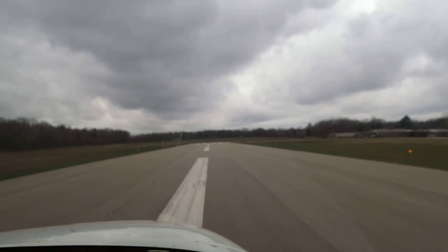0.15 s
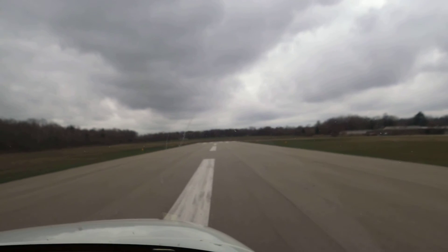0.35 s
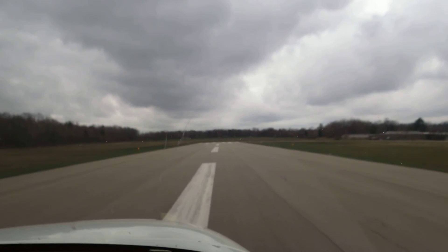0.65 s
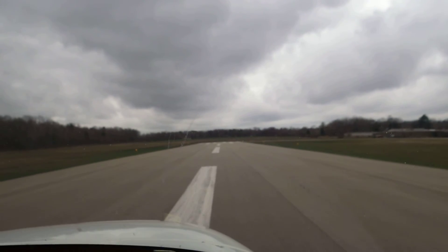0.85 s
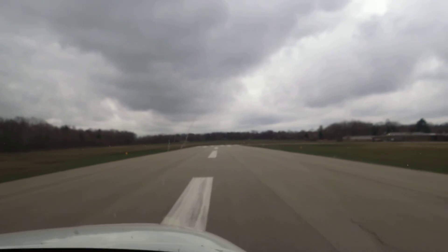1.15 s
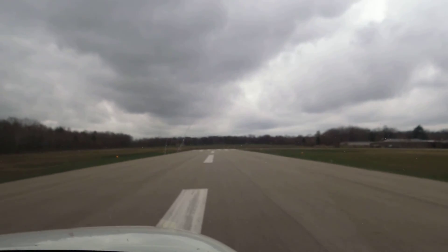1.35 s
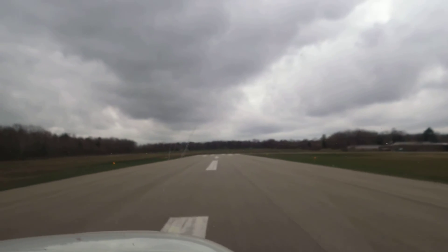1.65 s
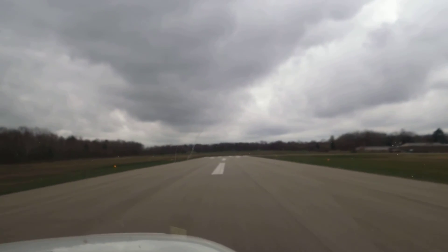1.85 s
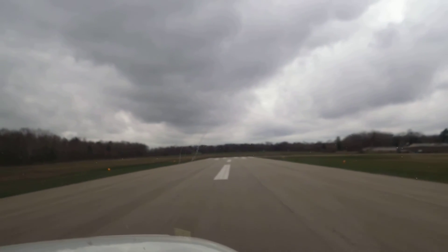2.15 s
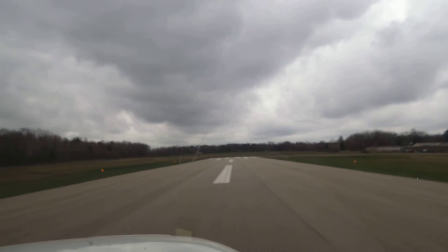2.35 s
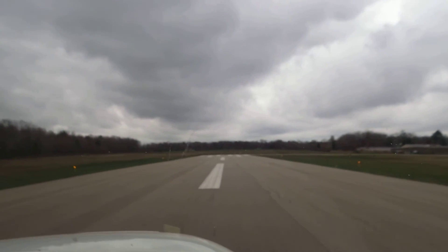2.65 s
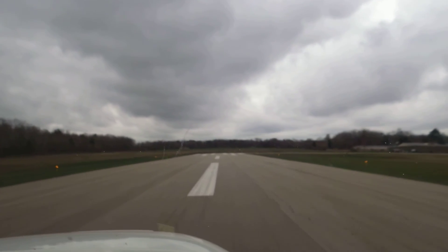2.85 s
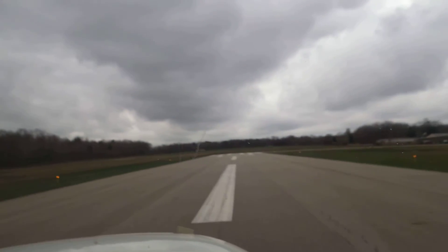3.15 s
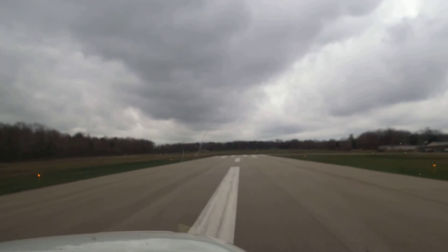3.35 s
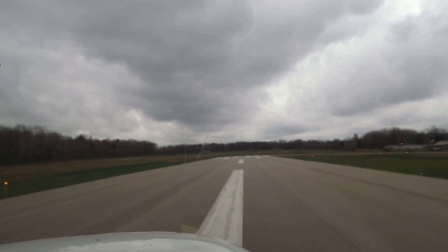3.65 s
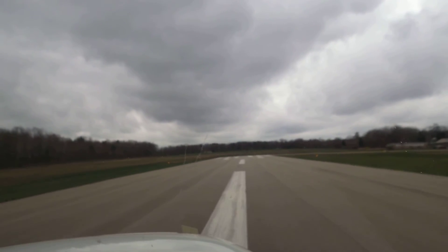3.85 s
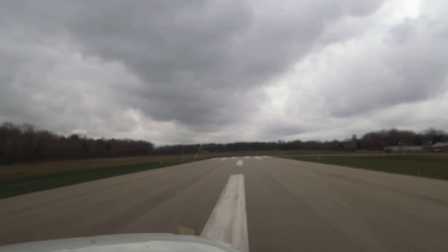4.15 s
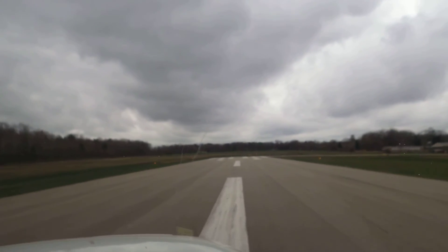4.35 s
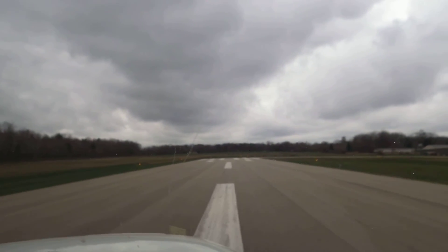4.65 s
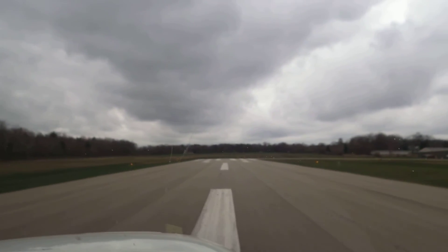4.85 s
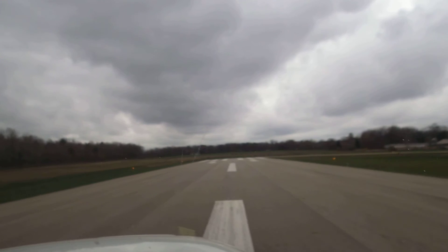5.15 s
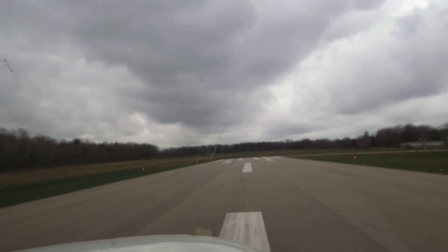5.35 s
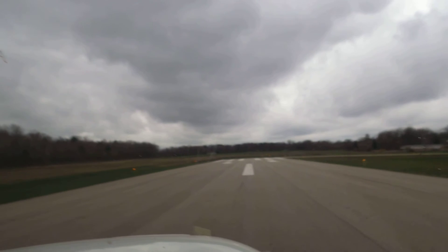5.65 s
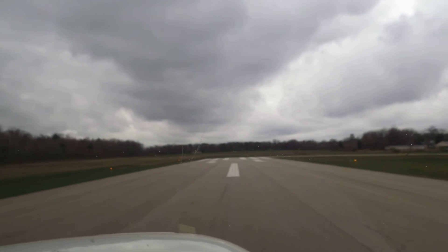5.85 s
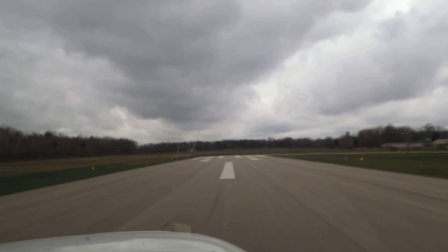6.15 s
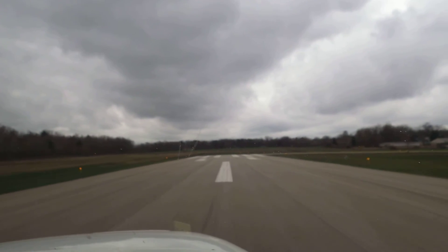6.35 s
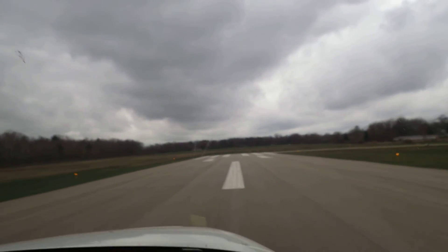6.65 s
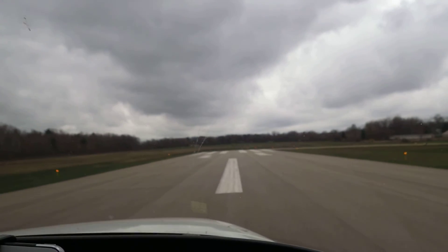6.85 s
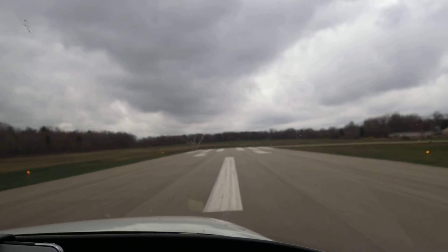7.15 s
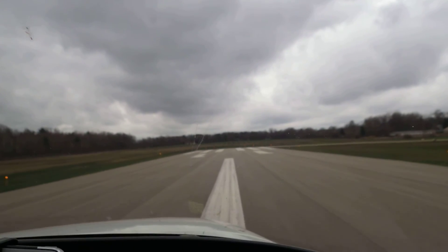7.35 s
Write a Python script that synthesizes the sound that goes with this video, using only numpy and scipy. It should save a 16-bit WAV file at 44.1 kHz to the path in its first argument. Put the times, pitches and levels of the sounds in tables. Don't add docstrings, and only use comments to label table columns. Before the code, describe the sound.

Inside a small propeller plane slowing on a paved runway, an idling piston engine drones low and steady beneath heavy, uneven rumble. Metal ticks come early, then a hard jolt slaps a panel, which bounces while the overall level dips and creeps back. Loose trim knocks on, most strongly past the middle. Faint vent hiss and thin whistles sit on top. A small stereo camera microphone inside the cockpit catches it all.

```python
import sys
import numpy as np
from scipy import signal
from scipy.io import wavfile
from scipy.ndimage import uniform_filter1d

SR = 44100
rng = np.random.default_rng(int(sys.argv[2]) if len(sys.argv) > 2 else 0)


def level_to_linear(level):
    exponent = np.asarray(level, float) / 20
    return 10 ** exponent


def unload_wav(signal):
    wavfile.write(
        sys.argv[1],
        SR,
        np.round(np.clip(np.atleast_2d(signal).T, -1, 1) * 32767).astype(np.int16),
    )


N = 330750
T = np.arange(N) / SR

# (time [s], frequency [Hz])
ENGINE_SPEED = [(0.0, 85.72), (0.3, 86.58), (1.2, 86.41), (1.8, 84.37), (2.5, 84.19), (3.25, 83.24),
                (4.2, 87.29), (5.2, 86.06), (5.7, 84.41), (6.1, 85.07), (6.7, 81.65), (7.1, 83.15),
                (7.5, 83.37)]
# (multiple of the four-stroke cycle [1], level [dB rms])
ENGINE_ORDERS = [(3, -49), (4, -35), (6, -34.5), (9, -26), (14, -29.5), (16, -37), (18, -32.5), (20, -33),
                 (21, -36), (27, -36), (43, -45), (60, -45)]
ENGINE_DB, ENGINE_DB_PER_HZ, ENGINE_PHASE = -22, -0.68, 5.67

# (time [s], frequency [Hz])
TREAD_TONE = [(0, 41.8), (1.4, 39.2), (2.25, 38.6), (3, 37.3), (4.7, 36), (5.25, 34.6), (5.8, 34.1),
              (6.6, 32.2), (7.5, 31.5)]
# (frequency [Hz], level [dB rms])
GEAR_LOW = [(31, -49), (34, -45), (35.2, -27), (36.1, -66), (37.2, -24), (38.6, -21.5), (39.3, -36.5),
            (42, -19)]
# (frequency [Hz], level [dB rms])
GEAR_HIGH = [(62, -40), (65.5, -34), (68.5, -20.5), (72, -28), (73, -18.5), (75, -19), (78.5, -32),
             (82, -35)]

# (time [s], level [dB])
ROUGHNESS = [(0, 1), (.3, 0.5), (.65, 2.5), (.85, -0.5), (1.3, 3.5), (2, 0), (2.6, 0), (3.4, -1),
             (4.2, 0.5), (4.7, -1.5), (5, 0), (5.6, -0.5), (5.9, 3), (6.15, -2), (6.4, -1), (6.85, -4),
             (7.25, -2), (7.5, -5)]
# (frequency [Hz], density [dB per Hz])
RUMBLE = [(14, -20), (25, -6), (50, -5), (65, -2), (80, -4), (95, -1), (140, 2), (163, -7), (190, -2),
          (230, -9), (300, -8), (322, -19), (400, -45), (700, -120)]
# (frequency [Hz], density [dB per Hz])
BOOM = [(180, -52), (300, -17), (338, -1), (429, 0.5), (601, -9.5), (700, -11), (910, -46), (1540, -120)]
RUMBLE_DB, BOOM_DB, BOOM_SHARE = -19, -30, 0.59
# (frequency [Hz], width [Hz], boost [dB])
PANELS = [(420, 60, 3), (1050, 60, 4), (1318, 35, 9), (1445, 50, 5), (2600, 90, 2), (2811, 50, 4),
          (3619, 90, 2)]
# (frequency [Hz], density [dB per Hz])
COWL = [(360, -33), (620, -8.5), (761, -0.5), (981, -3), (1060, -4), (1250, -6), (1350, -10.5), (1610, -13),
        (1650, -9.5), (2140, -48), (3630, -120)]
# (frequency [Hz], density [dB per Hz])
VALVES = [(700, -80), (1300, 3), (1500, 1), (2400, 0.5), (2900, 1.5), (3600, -1.5), (4250, -2), (4600, -38),
          (6000, -80)]
# (place in engine cycle [0-1], length [share of cycle], level over steady part [dB])
COWL_BURSTS = [(.125, .02, -5), (.47, .025, 0), (.55, .045, 5), (.63, .03, 0), (.83, .04, -2)]
# (place in engine cycle [0-1], length [share of cycle], level over steady part [dB])
VALVE_BURSTS = [(.15, .025, 1), (.47, .02, -8), (.635, .015, -4), (.82, .035, -1)]

AIR_DB, AIR_DB_PER_S = -42, -0.35
# (time [s], half length [s], boost [dB])
GUSTS = [
    (0, 0.048, 4),
    (6.867, 0.13, 1.5),
]
# (frequency [Hz], density [dB per Hz])
VENT = [(2500, -80), (3900, -36), (4250, -11), (4500, 0), (5000, 2), (6200, 2), (6800, 1.5), (7200, -9.5),
        (7800, -13), (9300, -9), (10500, -19), (13000, -80)]
# (frequency [Hz], width [Hz], level [dB])
SLOT_TONE = (6245, 60, -60)
# (start [s], length [s], frequency [Hz], level [dB])
WHISTLES = [
    (.5, 1, 6570, -53),
    (1.8, .9, 6572, -51),
    (3.1, 1.65, 6565, -52),
    (4.85, .35, 6575, -54),
    (5.5, .5, 6572, -54),
    (6.1, .4, 6578, -54),
    (6.85, .65, 6580, -55),
    (2.2, .5, 4915, -57),
    (3.05, 1.3, 4918, -55),
    (6.9, .65, 4942, -51),
]
SLIDE_HZ, WAVER_HZ, FADE_S = 35, 9, .08

# (time [s], peak [dB], ring frequency [Hz])
TICKS = [(.4135, -15, 6430), (.422, -19, 6000), (.47, -29, 6300), (.49, -26, 6200), (.5124, -29, 6400),
         (.5357, -31, 6100), (1.572, -23, 5680), (1.5735, -31, 6500), (1.8444, -32, 6570),
         (2.456, -30, 6540), (2.961, -28, 6200), (3.215, -37, 6580), (6.602, -36, 5900), (6.753, -37, 6150),
         (6.85, -38, 6410), (6.92, -35, 5900)]
# (frequency [Hz], width [Hz], level [dB])
METAL = [(2660, 210, -6), (3680, 360, -15), (4170, 500, -7.5), (9250, 530, -8), (9940, 370, -15),
         (10800, 790, -23)]
SCRAPE_S, TICK_PAN_DB, HEAVY_DB = .0065, -2.5, -14

# (time [s], peak [dB], mount sway [dB], bright edge [dB])
KNOCKS = [(0.802, -26, -11, -13), (1.336, -25, 2, -34), (1.411, -30, 2, -20), (1.433, -24.5, 2, -29),
          (1.457, -32, 7, -22), (1.481, -30, 0, -28), (2.725, -30, -9, -41), (3.303, -29.5, -10, -20),
          (3.506, -28.5, 20, -8), (4.154, -34, -10, -20), (4.232, -19.5, 6.5, -20), (4.537, -20.5, 9, -21),
          (4.583, -21, 12, -16), (4.711, -38, -12, -17), (4.752, -18.5, 0, -28), (4.964, -16.5, 4.5, -22),
          (5.005, -16.5, 9, -16), (5.034, -27, -9, -20), (5.099, -27.5, -2, -5), (5.785, -42, 0, -22),
          (6.255, -30, 0, -23), (6.4, -27, -14, -20), (6.834, -40, -9, -22)]
# (time [s], peak [dB], ring frequency [Hz], mount sway [dB])
BOUNCES = [
    (0.8544, -13, 610, 3),
    (.9, -21.5, 656, 1),
    (0.947, -33.5, 552, 13.5),
    (.972, -31.5, 574, 9),
    (1.004, -33, 603, 12),
    (1.047, -24, 640, 5.5),
    (1.085, -31.5, 650, 9.5),
]
TRIM_HZ, TRIM_SPREAD_HZ, EDGE_DB, KNOCK_PAN_DB = 1055, 35, -35, 4
# (time [s], peak [dB], half length [s])
BUMP = (.8565, -2, .0012)
WIND_UP_HZ, WIND_UP_DB, WIND_UP_S = 118, -9, .022

# (frequency [Hz], density [dB per Hz])
HISS = [(600, -60), (4000, -16), (7000, -3), (11000, 3.5), (14500, 4.5), (15600, -0.5), (17000, -7)]
HISS_DB = -51.5
# (frequency [Hz], width [Hz])
NOTCHES = [(1604, 276), (2083, 307), (3187, 695), (4156, 350), (7865, 98)]
DROP_S, DROP_DB, RECOVER_DB_PER_S = .860, -12, 10.5
CEILING, EDGE_HZ = .95, 15760
# (frequency [Hz], correlation [-1 to 1])
SAME = [(60, .96), (160, .995), (300, .96), (600, .92), (1220, .9), (2010, .97), (5500, .9), (9080, -.6)]
# (frequency [Hz], left minus right [dB])
LEAN = [(60, -.5), (160, -.5), (270, -1.2), (600, -.4), (1220, -1), (2400, 0), (5500, -4.3), (7400, 1)]


def evened(x):
    return x / np.sqrt(np.mean(x ** 2) + 1e-20)


def curve(rows):
    rows = np.asarray(rows)
    return np.interp(T, rows[:, 0], rows[:, 1])


def read(points, hz):
    f, value = np.transpose(points)
    return np.interp(np.log(hz + 1), np.log(f + 1), value)


def resonate(x, hz, width):
    return signal.lfilter(*signal.iirpeak(hz, hz / width, SR), x)


def wander(per_s):
    return np.interp(T * per_s, np.arange(1000), rng.standard_normal(1000))


def noise(shape, size, patchy_db, same=SAME, lean=LEAN):
    hop, hz = size // 4, np.fft.rfftfreq(size, 1 / SR)
    a, b, c, d, patches = rng.standard_normal((N // hop + 5, len(hz), 5)).T
    patches = uniform_filter1d(patches, size=6, axis=0)
    patches = evened(uniform_filter1d(patches, size=8, axis=1))
    peaks_db = sum(db / (1 + (2 * (hz - f) / w) ** 2) for f, w, db in PANELS)
    like = np.clip(read(same, hz), -1, 1)[:, None]
    left = a + 1j * b
    right = like * left + np.sqrt(1 - like ** 2) * (c + 1j * d)
    z = np.array([left, right])
    z *= level_to_linear((read(shape, hz) + peaks_db)[:, None] + patchy_db * patches)
    z *= level_to_linear(np.outer([.5, -.5], read(lean, hz)))[:, :, None]
    return evened(signal.istft(z, nperseg=size, noverlap=size - hop)[1][:, :N])


def cycles():
    return np.cumsum(curve(ENGINE_SPEED)) / SR / 12


def engine():
    turn = 2 * np.pi * cycles()
    weak = 0
    for k, db in ENGINE_ORDERS:
        size = level_to_linear(db + 4.2 * wander(4.0))
        weak = weak + size * np.cos(k * turn + 6 * rng.random() + 0.74 * wander(4.0))
    strong = level_to_linear(ENGINE_DB + ENGINE_DB_PER_HZ * (curve(ENGINE_SPEED) - 85) + wander(3.5))
    return np.sqrt(2) * (strong * np.cos(12 * turn + ENGINE_PHASE) + weak)


def tyres():
    hz = curve(TREAD_TONE)
    turn = 2 * np.pi * np.cumsum(hz) / SR
    low = level_to_linear(read(GEAR_LOW, hz))
    high = level_to_linear(read(GEAR_HIGH, 2 * hz) + 0.51 * wander(4.0))
    return np.sqrt(2) * (low * np.cos(turn) + high * np.cos(2 * turn))


def bursts(rows, uneven_db):
    power = np.ones(N)
    for at, length, db in rows:
        since = cycles() - at + .5
        size_db = db + uneven_db * rng.standard_normal(100)[np.floor(since).astype(int)]
        power += level_to_linear(2 * size_db) * np.exp(-.5 * ((since % 1 - .5) / length) ** 2)
    return evened(np.sqrt(power))


def airflow():
    gusts_db = sum(db * np.exp(-((T - s) / half) ** 2) for s, half, db in GUSTS)
    return level_to_linear(AIR_DB + AIR_DB_PER_S * T + gusts_db)


def airframe():
    rumble = level_to_linear(RUMBLE_DB + curve(ROUGHNESS)) * noise(RUMBLE, size=4096, patchy_db=0.96)
    boom = level_to_linear(BOOM_DB + BOOM_SHARE * curve(ROUGHNESS)) * noise(BOOM, size=1024, patchy_db=1.0)
    cowl = level_to_linear(3.5) * noise(COWL, size=2048, patchy_db=0.83) * bursts(COWL_BURSTS, uneven_db=.6)
    valves = level_to_linear(-2.5) * noise(VALVES, size=1024, patchy_db=1.03) * bursts(VALVE_BURSTS, uneven_db=1.2)
    return rumble + boom + airflow() * (cowl + valves)


def vent():
    jet = level_to_linear(0.74) * noise(VENT, size=512, patchy_db=0.5) * airflow()
    hz, width, db = SLOT_TONE
    whistle = level_to_linear(db) * evened(resonate(rng.standard_normal(N), hz, width))
    waver = WAVER_HZ * wander(9.0)
    flicker = np.sqrt(2) * level_to_linear(2 * wander(12.0))
    for start, length, hz, db in WHISTLES:
        part = slice(round(start * SR), round((start + length) * SR))
        t = T[part] - start
        pitch = hz - SLIDE_HZ * np.exp(-t / .15) + waver[part]
        on = np.clip(np.minimum(t, length - t) / FADE_S, 0, 1)
        tone = np.cos(2 * np.pi * np.cumsum(pitch) / SR)
        whistle[part] += on * level_to_linear(db) * flicker[part] * tone
    return jet + whistle * level_to_linear([[-6.5], [.5]])


def gain_db(t):
    fall = np.clip((t - DROP_S) / .0035, 0, 1)
    return fall * np.minimum(DROP_DB + RECOVER_DB_PER_S * (t - DROP_S), 0)


def place(out, s, sound, db, pan_db):
    sides_db = np.array([[.5], [-.5]]) * pan_db
    room = out[:, round(s * SR):]
    sound = sound * level_to_linear(db - gain_db(s - .001) + sides_db)
    room[:, :sound.shape[1]] += sound[:, :room.shape[1]]


def ticks():
    out, t = np.zeros((2, N)), T[:3000]
    for s, db, hz in TICKS:
        shared, *own = rng.standard_normal((3, len(t)))
        scrape = (shared + 1.1 * np.array(own)) * level_to_linear(-60 * np.maximum(t - SCRAPE_S, 0) / 0.041)
        heavy = hz < 5800
        own_ring = (hz, 650 if hz > 5800 else 150, .1)
        ring = 0
        for f, width, ring_db in [*METAL, own_ring]:
            size = level_to_linear(ring_db + HEAVY_DB * heavy * (f > 8000))
            ring = ring + size * resonate(resonate(scrape, f, width), f, 2 * width)
        place(out, s, ring / abs(ring).max(), db, TICK_PAN_DB)
    return out


def jolt(t, half):
    return (1 - .5 * (t / half) ** 2) * np.exp(-.5 * (t / half) ** 2)


def bump():
    s, db, half = BUMP
    decay_s = np.where(T < s, WIND_UP_S, WIND_UP_S / 2)
    swing = np.cos(2 * np.pi * WIND_UP_HZ * (T - s)) * np.exp(-abs(T - s) / decay_s)
    return level_to_linear(db) * jolt(T - s, half) + level_to_linear(WIND_UP_DB) * swing


def knocks():
    out, lead = np.zeros((2, N)), .003
    t = np.maximum(T[:5000] - lead, 0)
    rows = [(*row, EDGE_DB) for row in BOUNCES]
    rows += [(s, db, TRIM_HZ, *rest) for s, db, *rest in KNOCKS]
    chances = rng.standard_normal((len(rows), 2))
    for (s, db, hz, sway_db, edge_db), (off, side) in zip(rows, chances):
        hz = hz + TRIM_SPREAD_HZ * off * (hz > 850)
        modes = [(.74, 0.45), (1, 1), (1.23, 0.35), (1.7, 0.1)]
        ring = sum(np.sin(2 * np.pi * k * hz * t) * size for k, size in modes)
        ring *= level_to_linear(-60 * t / .03) * np.minimum(t / .0006, 1)
        sway = np.sin(2 * np.pi * 306 * t) * level_to_linear(-60 * t / 0.13) * [[-.1], [.8]]
        sway += np.sin(2 * np.pi * (352 - 250 * t) * t) * level_to_linear(-60 * t / .14) * .9 * (hz < 850)
        sway += 1.15 * jolt(T[:5000] - lead, 0.0007)
        edge = resonate(rng.standard_normal(len(t)), 2250, 950) * level_to_linear(15.0) * (t > 0)
        edge *= level_to_linear(-60 * t / .03)
        place(out, s - lead, ring + level_to_linear(sway_db) * sway + level_to_linear(edge_db) * edge, db, KNOCK_PAN_DB * side)
    return signal.lfilter(*signal.butter(4, 3000, fs=SR), out)


def scene():
    tones = (engine() + tyres()) * level_to_linear([[.8], [1.2]])
    return tones + airframe() + vent() + ticks() + knocks() + bump()


def top_cut(x):
    return signal.sosfilt(signal.butter(12, 15990, fs=SR, output="sos"), x)


def record(dry):
    x = dry + level_to_linear(HISS_DB) * noise(HISS, size=512, patchy_db=0.0, same=[(1, 0.0046)], lean=[(1, 0)])
    for hz, width in NOTCHES:
        x = signal.lfilter(*signal.iirnotch(hz, hz / width, SR), x)
    x = signal.lfilter(*signal.butter(2, 16, "high", fs=SR), x)
    x = x * level_to_linear(gain_db(T)) * signal.windows.tukey(N, .002)
    x = x / (1 + (x / CEILING) ** 4) ** .25
    x = signal.sosfiltfilt(signal.ellip(10, .5, 60, EDGE_HZ, fs=SR, output="sos"), x)
    return top_cut(x)


dry = scene()
out = record(dry)
unload_wav(out)
```